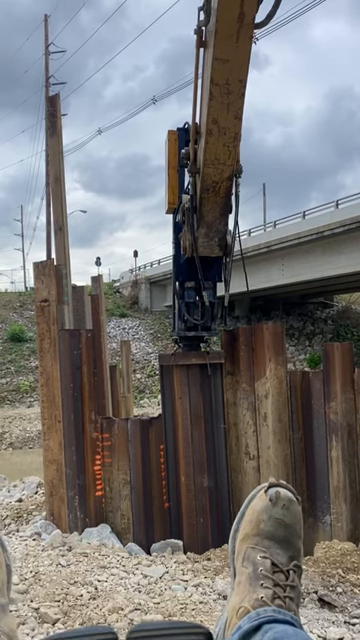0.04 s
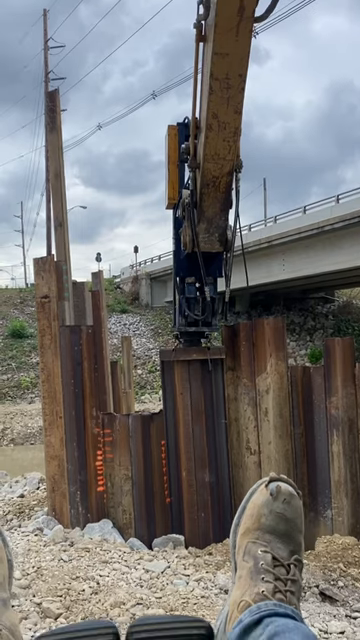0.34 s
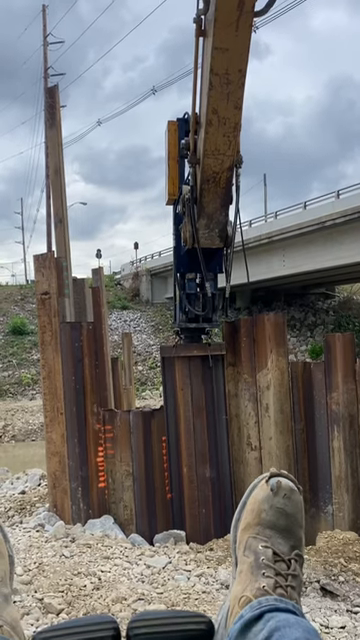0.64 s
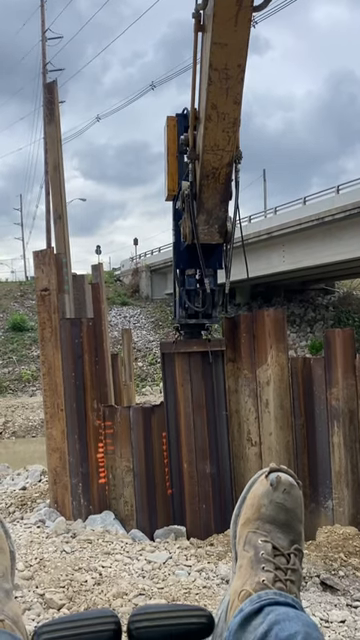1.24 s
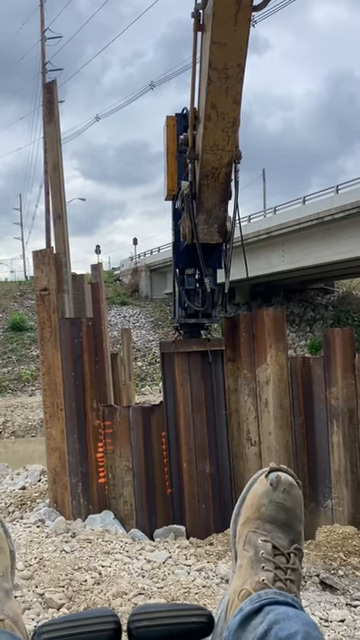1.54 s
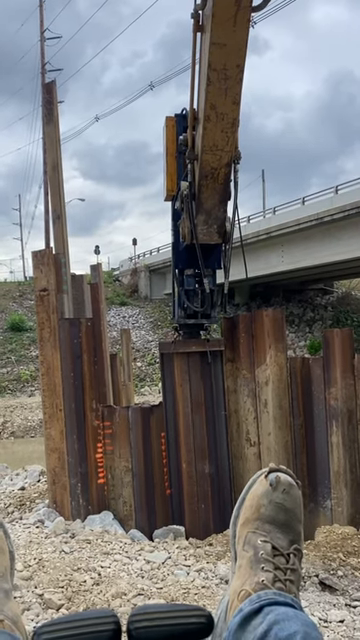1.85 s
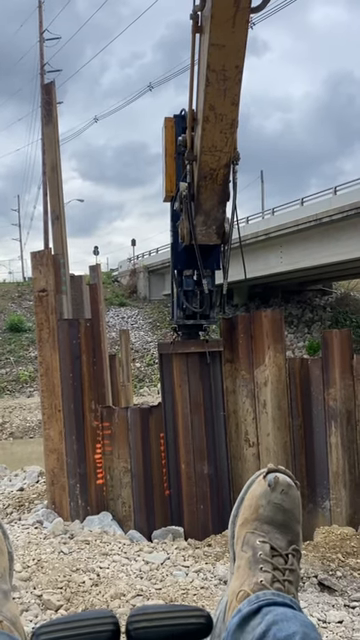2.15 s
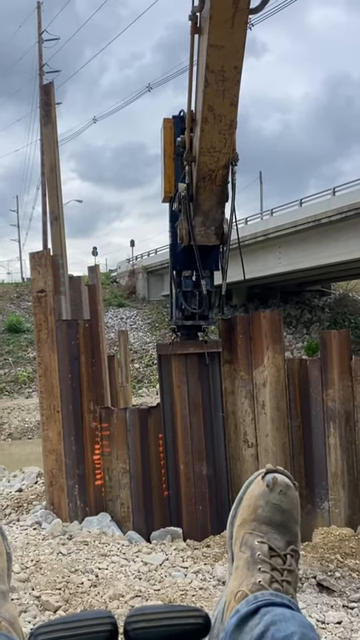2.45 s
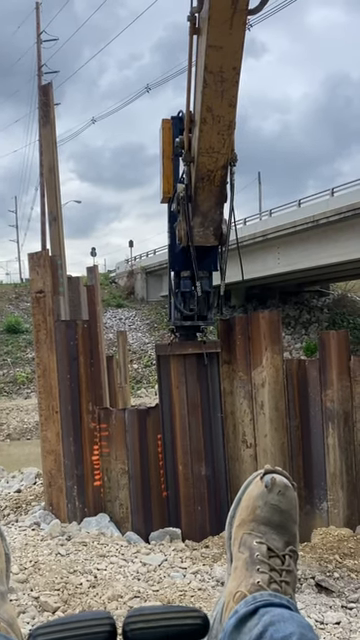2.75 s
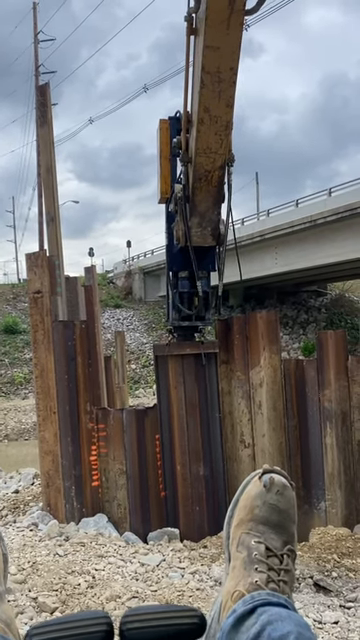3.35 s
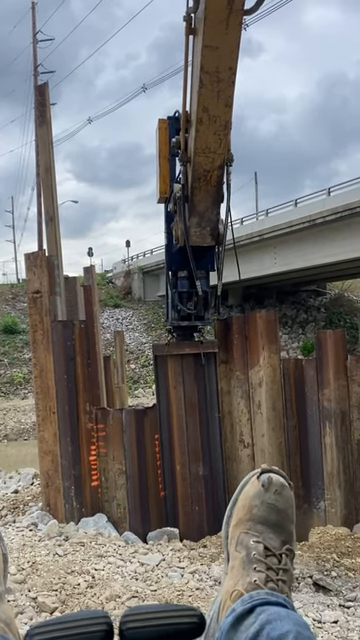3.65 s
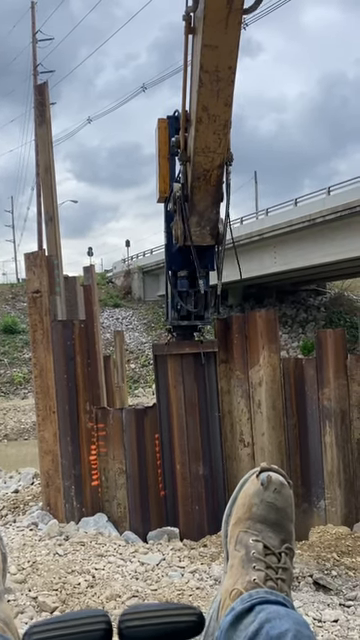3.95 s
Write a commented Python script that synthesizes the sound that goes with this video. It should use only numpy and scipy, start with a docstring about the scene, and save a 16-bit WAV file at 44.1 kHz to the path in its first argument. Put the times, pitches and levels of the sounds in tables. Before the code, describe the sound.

A drop hammer strikes a steel sheet pile once, heard from an excavator cab. The diesel engine rumbles steadily throughout, with faint cab rattles near 0.3 and 1.5 seconds and a tiny squeak at 2.4. At about 2.85 seconds comes the loud, briefly ringing metallic bang. A duller echo and a low shudder follow, with lighter hollow knocks and metal clanks from 3.1 to 3.8 seconds.

```python
"""From the cab of an excavator, on a microphone pair. The diesel runs steadily and the cab rattles faintly.
After a faint squeak, at 2.85 s, a drop hammer strikes a steel sheet pile once: the pile rings and the
limiter ducks under the blow. The bang comes back from a bridge and an embankment farther off,
the machine shudders, and the hammer's frame knocks and its gear clanks over the running engine."""
import sys
import numpy as np
from scipy import signal
from scipy.fft import rfft, irfft
from scipy.io import wavfile
from scipy.ndimage import uniform_filter1d

SR = 44100
rng = np.random.default_rng(int(sys.argv[2]) if len(sys.argv) > 2 else 0)


def master_out(mix):
    """Clip the mix to full scale and print it as 16-bit PCM to the path in sys.argv[1]."""
    frames = np.transpose(np.atleast_2d(mix))
    ceiling = np.clip(frames, -1, 1)
    pcm = np.round(ceiling * 32767).astype(np.int16)
    wavfile.write(sys.argv[1], SR, pcm)


N = 176400
T = np.arange(N) / SR
HZ = np.maximum(np.arange(N // 2 + 1) * SR / N, 1)
BLOW_S = 2.8485


def from_db(db):
    """Decibels to gain."""
    return 10 ** (np.asarray(db) / 20)


def rms_one(x):
    """Scale to unit rms."""
    return x / np.sqrt(np.mean(x ** 2) + 1e-20)


def at_hz(points, hz, column=1):
    """Read one column of a table on a log-frequency axis."""
    table = np.array(points, float)
    return np.interp(np.log(hz), np.log(table[:, 0]), table[:, column])


def drift(rate_hz):
    """Random wander, mostly slower than rate_hz; rms 1."""
    return rms_one(irfft(rfft(rng.standard_normal(N)) / (1 + (HZ / rate_hz) ** 2), N))


def noise(spectrum, tilt_db=0):
    """Coloured noise, partly alike at the two microphones, tilted per octave above 270 Hz; rms 1."""
    mid, side = rfft(rng.standard_normal((2, N)))
    alike = np.clip(at_hz(MIC_PAIR, HZ, column=3), 0, 1)
    pair = np.sqrt(1 + alike) * mid + np.sqrt(1 - alike) * side * [[1], [-1]]
    colour_db = at_hz(spectrum, HZ) + tilt_db * np.log2(np.maximum(HZ, 270))
    return rms_one(irfft(pair * from_db(colour_db), N))


def burst(start_s, rise_s, t60_s):
    """Envelope: a linear rise and an exponential decay."""
    age = np.maximum(T - start_s, 0)
    return np.minimum(age / max(rise_s, 1e-4), 1) * from_db(-60 * age / t60_s)


# Engine tones in the cab: multiple_of_cycle_rate, level_db
ENGINE_ORDERS = [(5, -39), (6, -36.5), (7, -43), (9, -46), (12, -35), (18, -53), (24, -56.5), (36, -47.5)]
# Exhaust and cab rumble: frequency_hz, density_db
RUMBLE_COLOUR = [(26, -48), (42, -13.5), (60, 2), (90, -8), (120, -7), (145, -14.5), (400, -17),
                 (570, -23.5), (1100, -30), (2000, -65)]
# Fan and hydraulic hiss: frequency_hz, density_db
HISS_COLOUR = [(400, 6), (1000, 1.5), (1500, 3.5), (2400, 1.5), (3300, -3.5), (5000, -3), (7000, -12),
               (14000, -67)]
# Its course, taken about its mean: time_s, relative_db
HISS_COURSE = [(0, -55.5), (2.2, -55.5), (2.6, -56.5), (4, -53.5)]
# The top of the hiss: frequency_hz, density_db
SIZZLE_COLOUR = [(7300, -25), (8600, 3.5), (11300, -3), (14000, -7)]
# Its course: time_s, level_db
SIZZLE_COURSE = [(2.15, -59.5), (2.45, -63.5), (3.38, -63.5), (4, -60)]


def engine(firing_hz=79.69, cylinders=6):
    """The diesel, close by: wavering tones, a throbbing rumble and hiss that pulses at each firing."""
    firing_phase = 2 * np.pi * np.cumsum(firing_hz * (1 + 0.0026 * drift(2.7))) / SR
    tones = 0
    for order, db in ENGINE_ORDERS:
        amplitude = np.sqrt(2) * from_db(db + 1.58 * drift(6))
        tones += amplitude * np.sin(round(order) / cylinders * firing_phase + 2 * np.pi * rng.random())
    rumble = from_db(-32.5) * noise(RUMBLE_COLOUR)
    deep = irfft(rfft(rumble) / (1 + (HZ / 130) ** 2) ** 2, N)
    rumble += deep * (from_db(2 * drift(14)) - 1)  # uneven combustion swells the deepest rumble
    flow_db = np.interp(T, *np.transpose(HISS_COURSE))
    pulsing = 1 + 0.065 * np.sin(firing_phase)
    hiss = from_db(-50 + flow_db - flow_db.mean()) * noise(HISS_COLOUR) * pulsing
    sizzle = from_db(np.interp(T, *np.transpose(SIZZLE_COURSE))) * noise(SIZZLE_COLOUR)
    return tones + rumble + hiss + sizzle


# Hard contact, in the rattles and the ram's snap: frequency_hz, density_db
CONTACT_COLOUR = [(1500, -18), (5000, -0.5), (7000, -21), (10500, 2), (14000, -16)]
# Rattles in the cab: start_s, level_db
CAB_RATTLES = [(.27, -53), (1.418, -54), (1.518, -51), (1.665, -55)]


def cab_rattles():
    """Faint, bright rattles in the cab, near the microphones."""
    envelope = sum(from_db(db) * burst(start, rise_s=0.0025, t60_s=0.18) for start, db in CAB_RATTLES)
    return noise(CONTACT_COLOUR) * envelope


# Squeak before the drop: centre_s, pitch_hz, level_db, half_length_s
DROP_SQUEAKS = [(2.42, 1495, -50.5, .016)]


def squeak():
    """One faint tone swells and fades."""
    return sum(from_db(db) * np.exp(-.5 * ((T - centre) / width) ** 2) * np.sin(2 * np.pi * hz * T)
               for centre, hz, db, width in DROP_SQUEAKS)


def bending_wave(hz, t60_s):
    """Envelope of one pitch of the struck pile: low bending waves leave it later than high ones."""
    lag_s = 0.00034 * (1000 / hz) ** 0.68
    return burst(BLOW_S + lag_s, 0.0013, t60_s)


# Dense ringing of the struck steel: frequency_hz, density_db
STEEL_COLOUR = [(60, 2), (160, 5.5), (205, -3), (310, 5.5), (500, -4), (720, 1.5), (1100, -5.5),
                (1550, 4.5), (1900, -2), (2350, 3), (3100, -6), (4200, -11), (5200, -6), (6700, -16),
                (9200, -12.5), (11500, -19.5), (14000, -51)]
# Its decay: frequency_hz, t60_s
STEEL_DECAY = [(150, 0.21), (320, 0.23), (800, 0.24), (2000, 0.11), (5000, 0.21), (11000, 0.13)]
# Clear modes of pile and hammer: pitch_hz, level_db, t60_s
STEEL_MODES = [(692, -25, .2), (1222, -28, .3), (1417, -23, .18), (1500, -24, .32), (1688, -23, .24),
               (1908, -24, .18), (2154, -22, .18), (2272, -28, .38), (2420, -23, .22), (2640, -24, .18),
               (2987, -27, .18), (3276, -26, .35), (4440, -34, .4), (5132, -24, .16), (5625, -21.5, .15),
               (5985, -31, .36), (10150, -45.5, 1.1)]
# Low thud of the pile wall: lag_s, pitch_hz, level_db, rise_s, t60_s
WALL_THUDS = [(.003, 286, -2.5, 0.0024, 0.059)]


def hammer_blow():
    """Outside the cab the ram hits the pile: a snap, a thud, a crowd of short modes and clear rings."""
    steel = rfft(noise(STEEL_COLOUR))
    centres_hz = np.geomspace(100, 12800, 8)
    crowd = rings = 0
    for hz, share in zip(centres_hz, np.eye(len(centres_hz))):
        band = irfft(steel * np.interp(np.log(HZ), np.log(centres_hz), share), N)
        crowd += band * bending_wave(hz, at_hz(STEEL_DECAY, hz))
    for hz, db, t60 in STEEL_MODES:
        amplitude = from_db(db + 1.3 * drift(60))  # loose joints chatter and roughen the mode
        rings += amplitude * bending_wave(hz, t60) * np.sin(2 * np.pi * (hz * T + rng.random()))
    # The wall of piles scatters the bang.
    scatter = from_db(-31) * noise(STEEL_COLOUR) * burst(BLOW_S, rise_s=0.029, t60_s=1)
    snap = from_db(-22) * noise(CONTACT_COLOUR) * burst(BLOW_S, rise_s=0, t60_s=0.0034)
    thud = sum(from_db(db) * burst(BLOW_S + lag, rise, t60) * np.sin(2 * np.pi * hz * (T - BLOW_S - lag))
               for lag, hz, db, rise, t60 in WALL_THUDS)
    return snap + thud + from_db(-1.5) * crowd + rings + scatter


# Returns of the bang at the cab: delay_s, level_db, rise_s, t60_s
ECHO_RETURNS = [(.177, -23.5, 0.0089, 0.29), (.235, -31.5, 0.021, 0.81), (.295, -33.5, .025, .45),
                (.41, -46, 0.028, 1.14)]
# Their colour: frequency_hz, density_db
RETURN_COLOUR = [(100, -9), (450, -1), (560, -2), (760, 9.5), (1010, -2), (1500, -2.5), (5000, -12.5),
                 (7300, -24), (9000, -22), (14000, -43)]


def echoes(dull_hz=1910):
    """Farther off, bridge and rocky embankment return the bang by countless paths, duller and blurred."""
    power = sum((from_db(db) * burst(BLOW_S + delay, rise, t60)) ** 2
                for delay, db, rise, t60 in ECHO_RETURNS)
    steel_pitches = 0
    for hz, db, t60 in STEEL_MODES:
        weight = from_db(db) * t60 / (1 + (hz / dull_hz) ** 2)
        steel_pitches += weight * drift(20) * np.sin(2 * np.pi * hz * T)
    return (noise(RETURN_COLOUR) + from_db(-7) * rms_one(steel_pitches)) * np.sqrt(power)


# Shudder of the machine: frequency_hz, density_db
SHUDDER_COLOUR = [(22, -33), (40, 0), (130, -7.5), (800, -23.5), (2000, -71)]


def boom_shudder():
    """The boom shudders after the blow: a low, slowly dying rumble in the cab."""
    return from_db(-26) * noise(SHUDDER_COLOUR) * burst(start_s=3.04, rise_s=0.035, t60_s=1.98)


# Knocks of the hammer's frame: start_s, level_db, t60_s
FRAME_KNOCKS = [(3.096, -31, .05), (3.831, -35, 0.48)]
# Their colour: frequency_hz, density_db
KNOCK_COLOUR = [(100, -8), (740, -1), (1000, -16), (4000, -42)]


def frame_knocks():
    """Out at the pile, the hammer's frame gives two hollow knocks."""
    envelope = sum(from_db(db) * burst(start, 0.0027, t60) for start, db, t60 in FRAME_KNOCKS)
    return noise(KNOCK_COLOUR) * envelope


# Clanks of the hammer's gear: start_s, level_db, rise_s, t60_s, tilt_db_per_octave
GEAR_CLANKS = [(3.421, -31.5, 0.0055, 0.18, 1), (3.571, -49.5, .0066, 0.43, 3), (3.798, -47, .004, .42, 14),
               (3.828, -39, .0018, 0.058, 4.5)]
# Their colour before the tilt: frequency_hz, density_db
CLANK_COLOUR = [(100, -20), (700, 6), (3150, 5), (3800, -5.5), (4700, 2.5), (7000, -10), (10000, -11),
                (14000, -22)]


def gear_clanks():
    """The hammer's gear clanks four times, each with its own brightness."""
    return sum(from_db(db) * noise(CLANK_COLOUR, tilt) * burst(start, rise, t60)
               for start, db, rise, t60, tilt in GEAR_CLANKS)


def scene():
    """The site as heard from the cab."""
    return (engine() + cab_rattles() + squeak() + hammer_blow() + echoes()
            + boom_shudder() + frame_knocks() + gear_clanks())


# Microphone pair in the cab: frequency_hz, left_lead_rad, left_minus_right_db, likeness_0_to_1
MIC_PAIR = [(80, .05, 4, .995), (165, 0, 7, .98), (240, -1.3, 12, .5), (340, -2.4, 9, .62),
            (500, -2.5, 4, .7), (700, -2.4, 4, .7), (960, -2.1, 1, .75), (1350, -.6, 0, .72),
            (1900, -.1, -1.5, .82), (2700, .8, -3, .75), (3800, .55, -1, .82), (5700, .5, 0, .74),
            (6600, 2.5, 0, .8), (7500, 3.14, 0, .95), (8500, 3.9, 0, .75), (9700, 6.1, 0, .74)]


def record(dry, limit_db=-7.5, release_db_per_s=27, ceiling=.98, stopband_hz=13300):
    """The microphone pair shifts phase and balance; a limiter ducks and recovers; the top is cut."""
    lean = from_db(at_hz(MIC_PAIR, HZ, column=2) / 2) * np.exp(.5j * at_hz(MIC_PAIR, HZ, column=1))
    pair = irfft(rfft(dry) * np.array([lean, 1 / lean]), N)
    power = uniform_filter1d(np.mean(pair ** 2, axis=0), int(.006 * SR))
    over_db = np.maximum(10 * np.log10(np.abs(power) + 1e-12) - limit_db, 0)
    duck_db = np.maximum.accumulate(over_db + release_db_per_s * T) - release_db_per_s * T
    rounded = ceiling * np.tanh(pair * from_db(-duck_db) / ceiling)
    return signal.sosfilt(signal.cheby2(10, 50, stopband_hz, fs=SR, output="sos"), rounded)


dry = scene()
out = record(dry)
master_out(out)
```